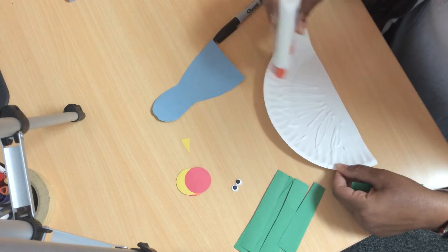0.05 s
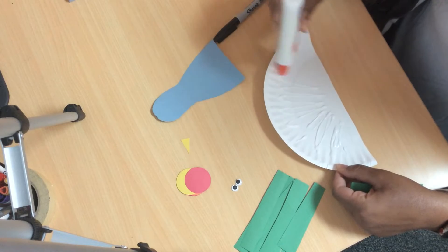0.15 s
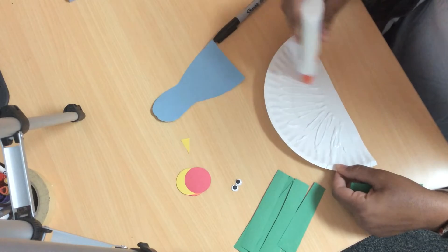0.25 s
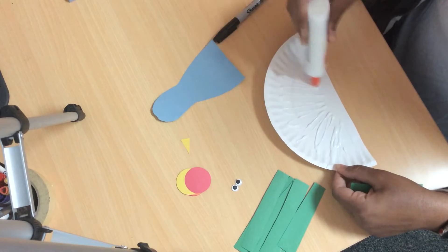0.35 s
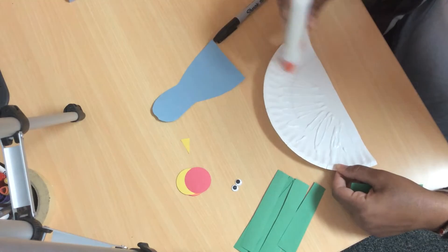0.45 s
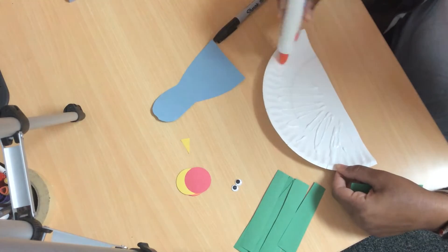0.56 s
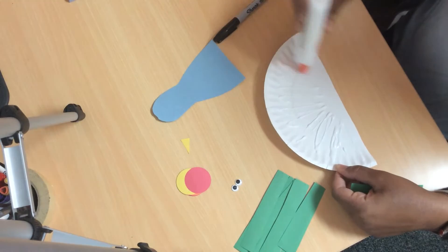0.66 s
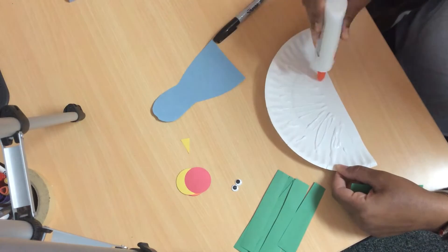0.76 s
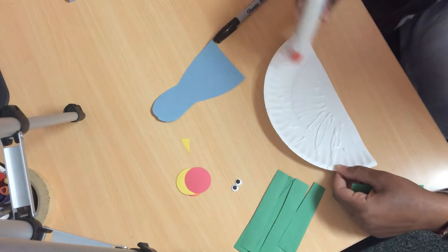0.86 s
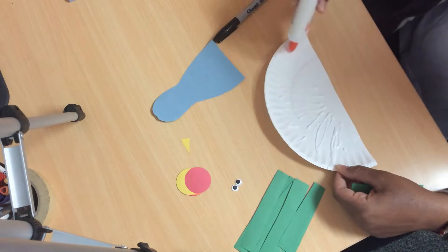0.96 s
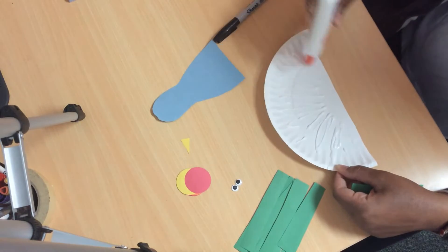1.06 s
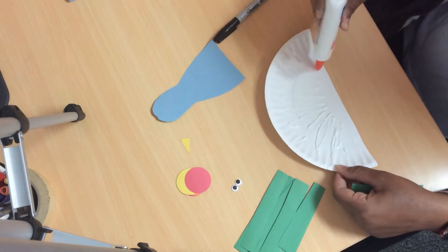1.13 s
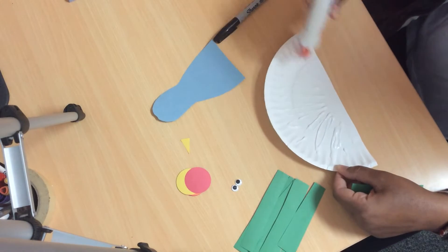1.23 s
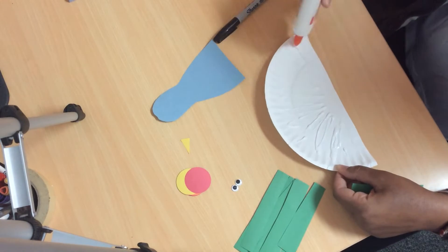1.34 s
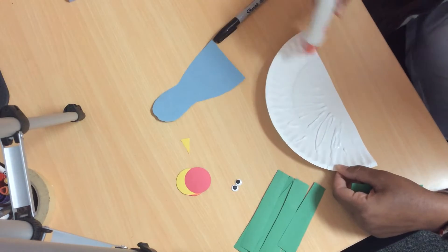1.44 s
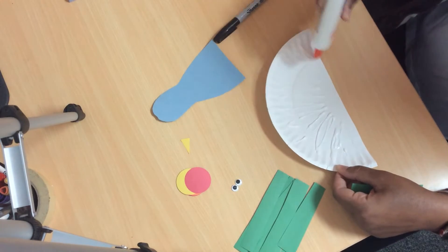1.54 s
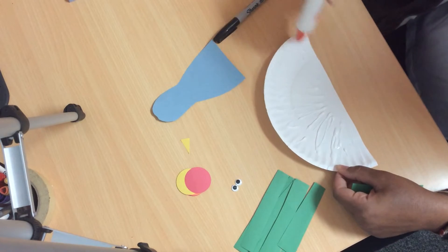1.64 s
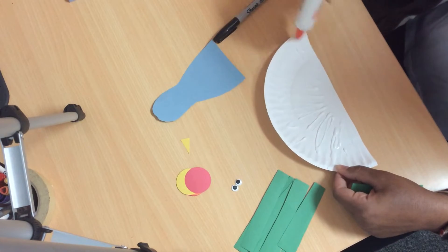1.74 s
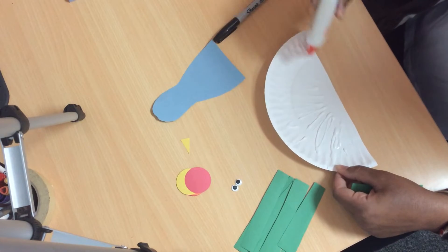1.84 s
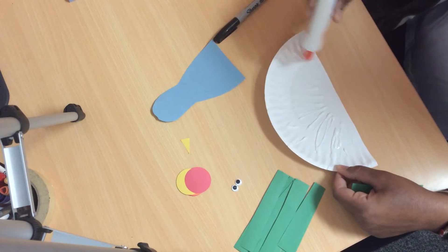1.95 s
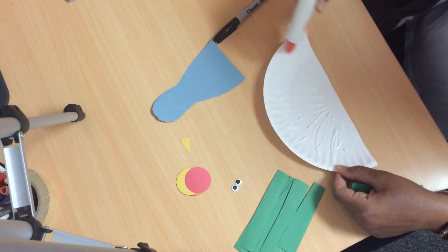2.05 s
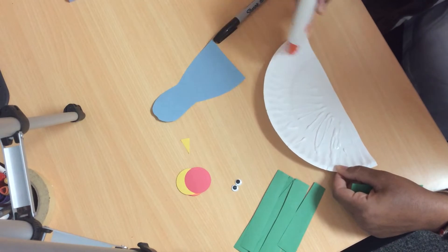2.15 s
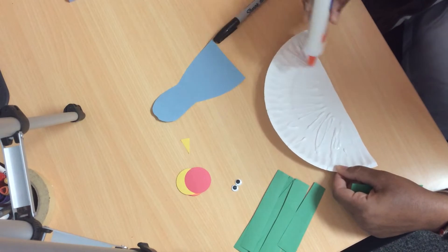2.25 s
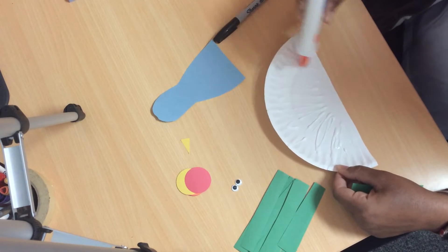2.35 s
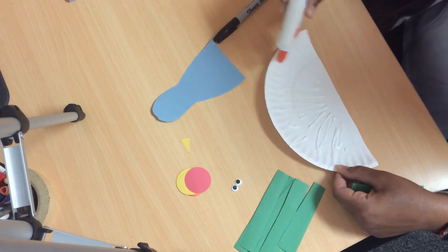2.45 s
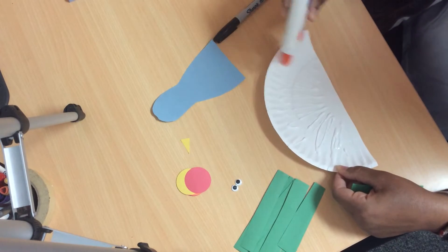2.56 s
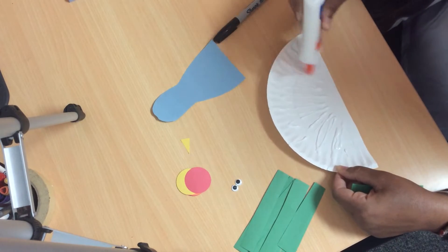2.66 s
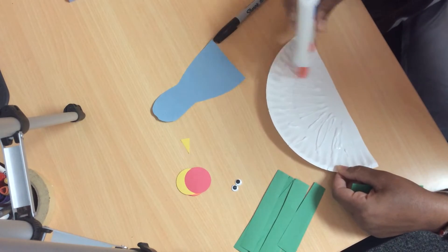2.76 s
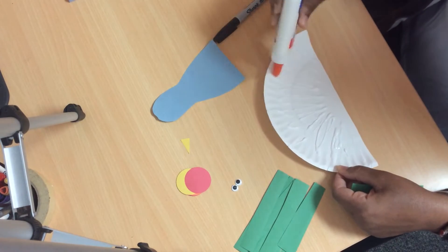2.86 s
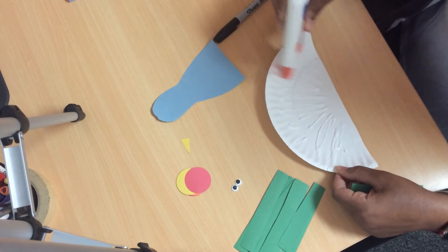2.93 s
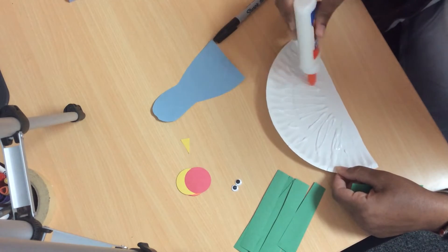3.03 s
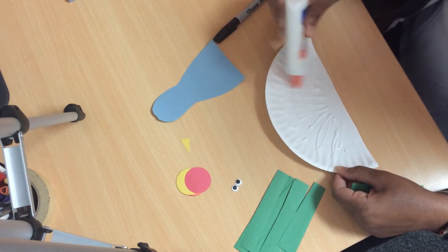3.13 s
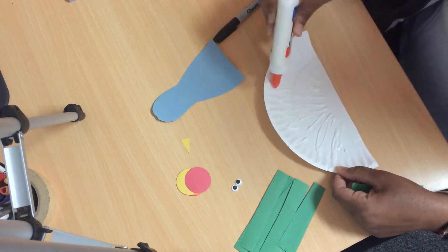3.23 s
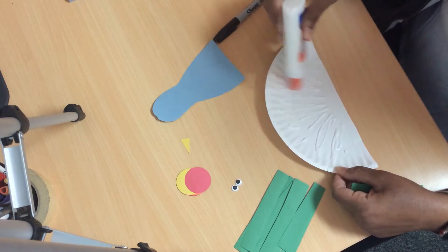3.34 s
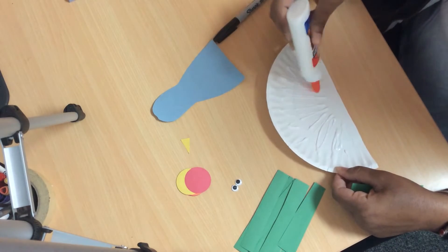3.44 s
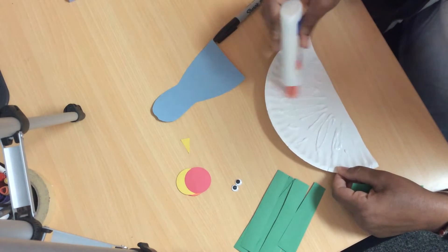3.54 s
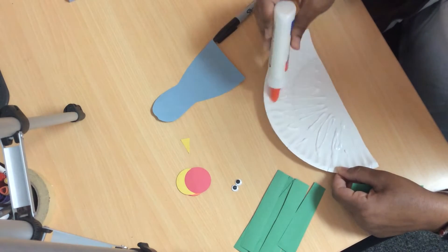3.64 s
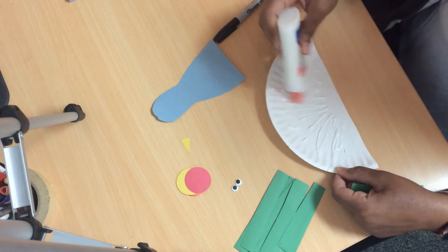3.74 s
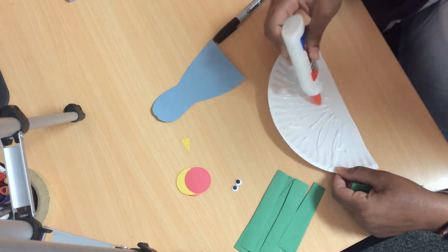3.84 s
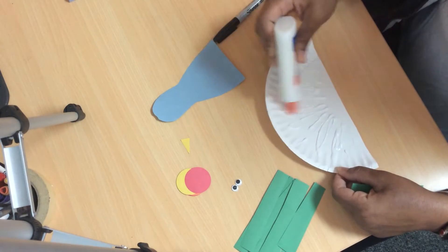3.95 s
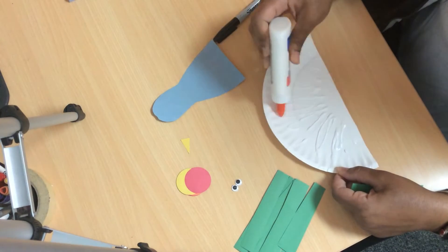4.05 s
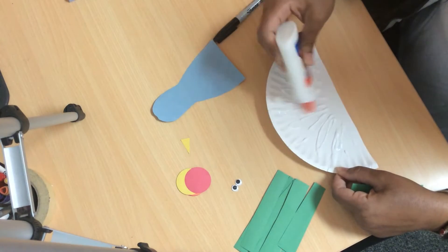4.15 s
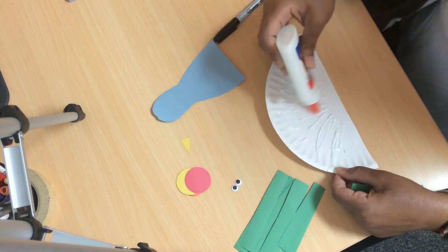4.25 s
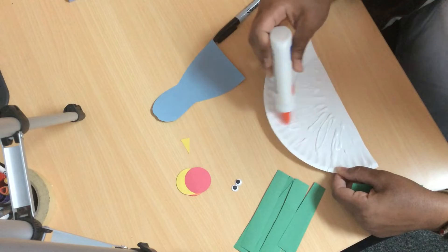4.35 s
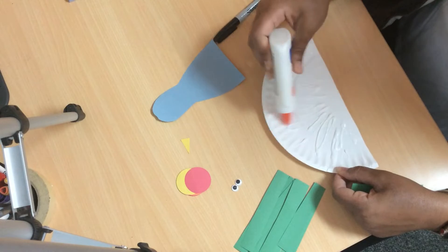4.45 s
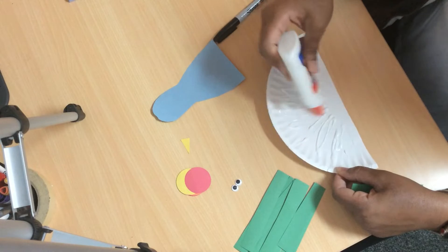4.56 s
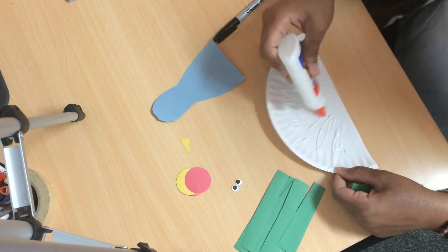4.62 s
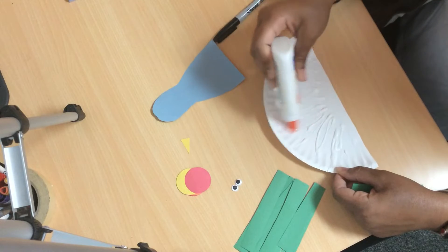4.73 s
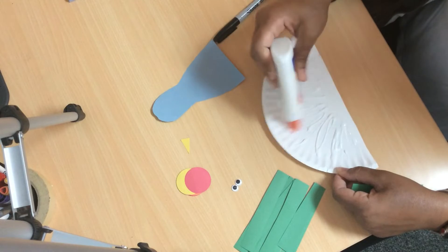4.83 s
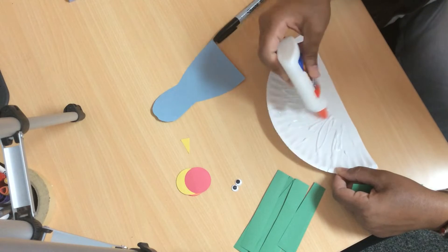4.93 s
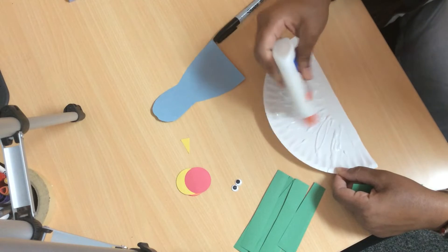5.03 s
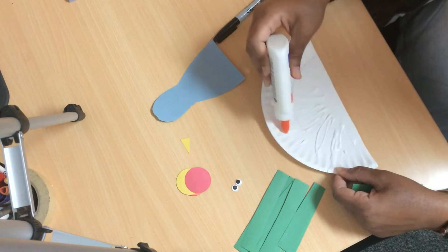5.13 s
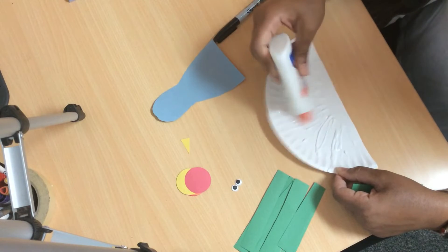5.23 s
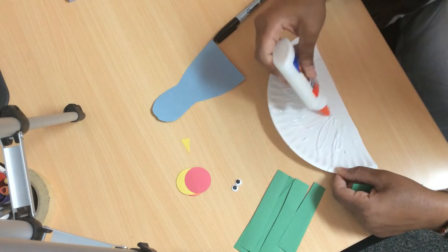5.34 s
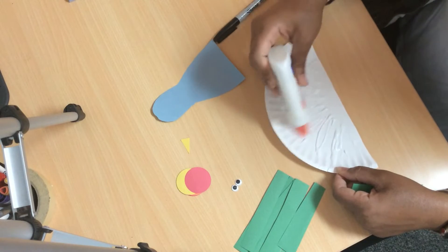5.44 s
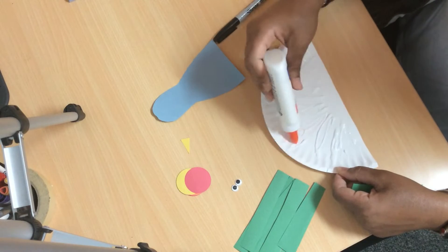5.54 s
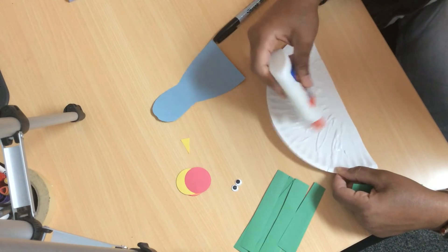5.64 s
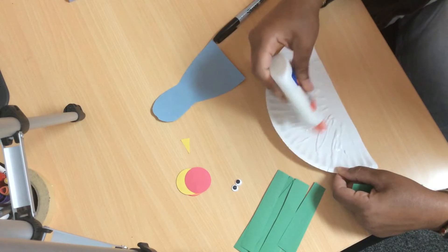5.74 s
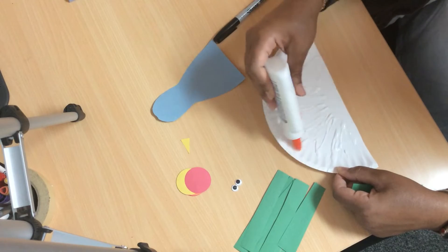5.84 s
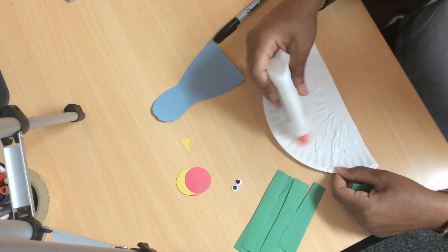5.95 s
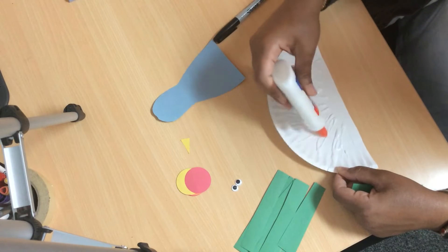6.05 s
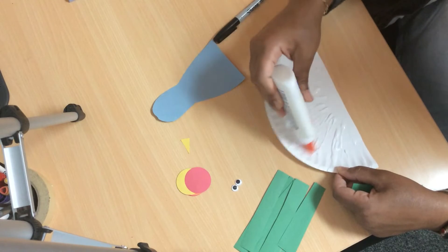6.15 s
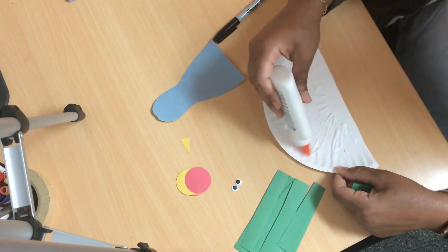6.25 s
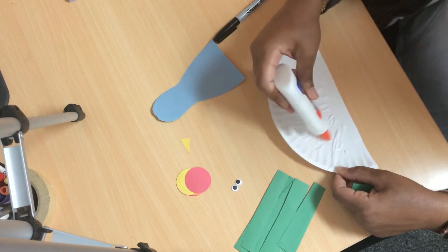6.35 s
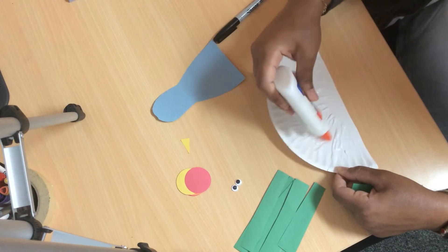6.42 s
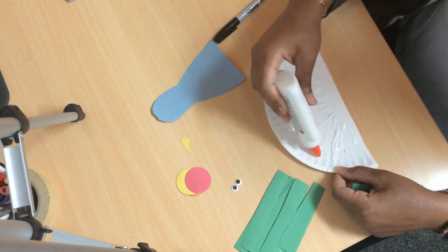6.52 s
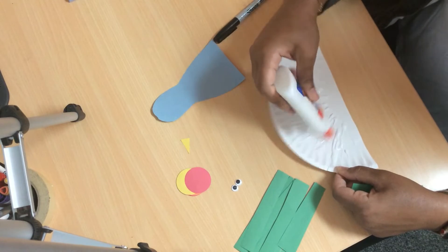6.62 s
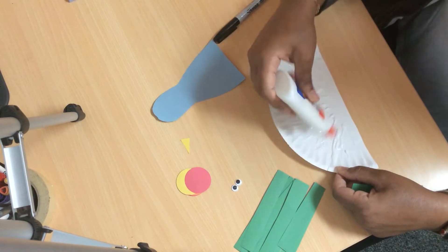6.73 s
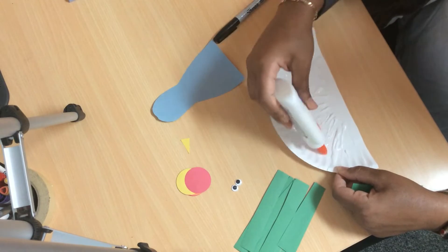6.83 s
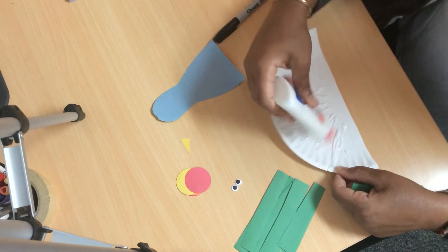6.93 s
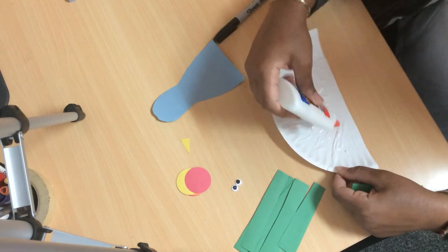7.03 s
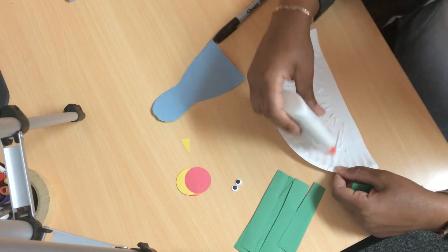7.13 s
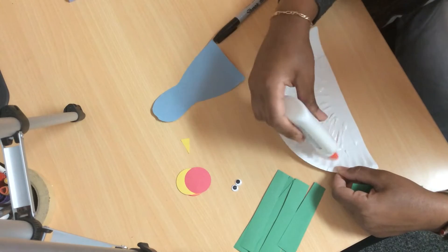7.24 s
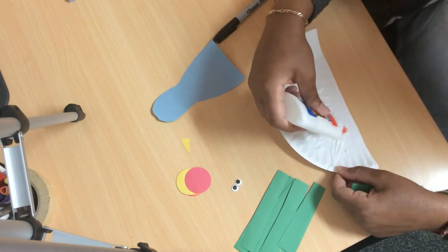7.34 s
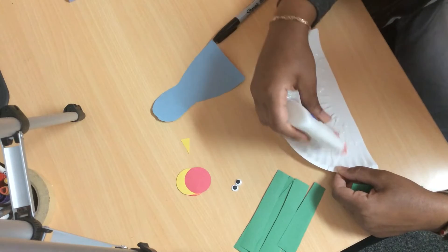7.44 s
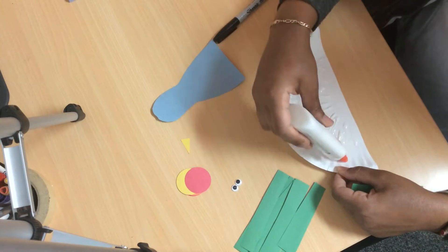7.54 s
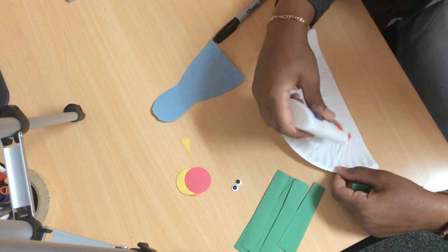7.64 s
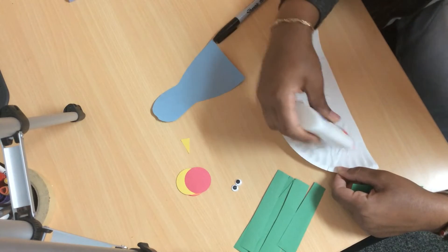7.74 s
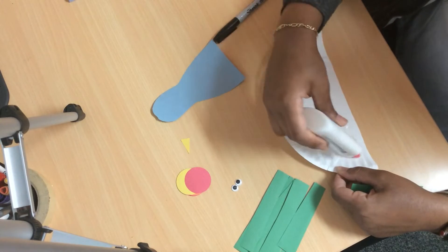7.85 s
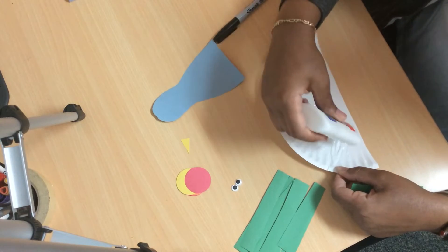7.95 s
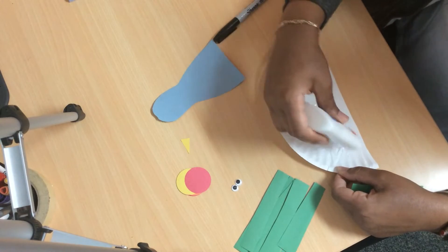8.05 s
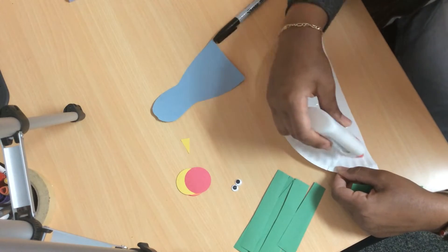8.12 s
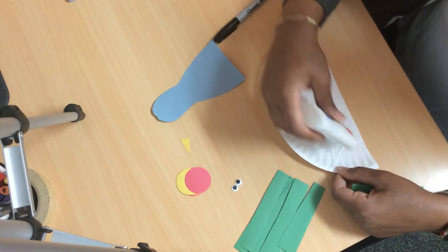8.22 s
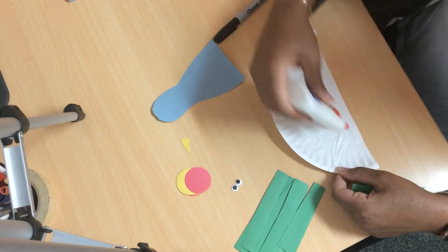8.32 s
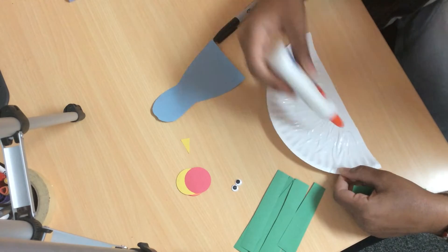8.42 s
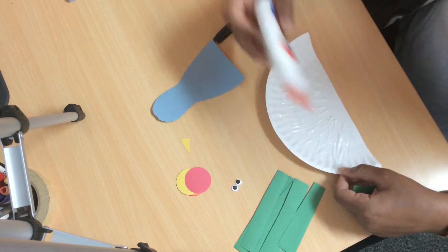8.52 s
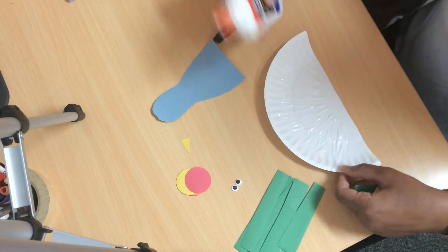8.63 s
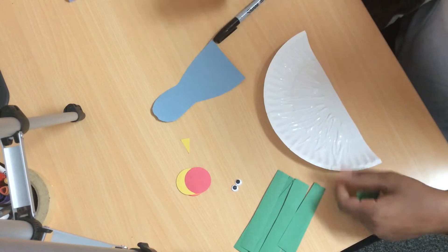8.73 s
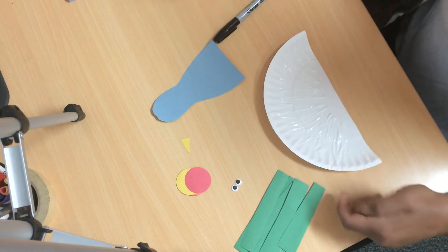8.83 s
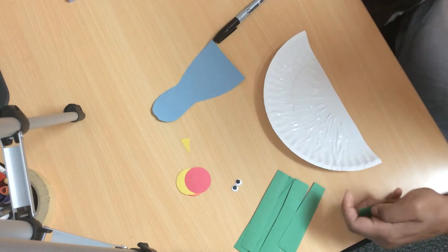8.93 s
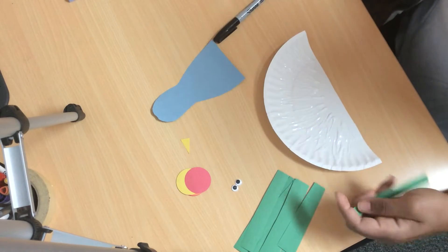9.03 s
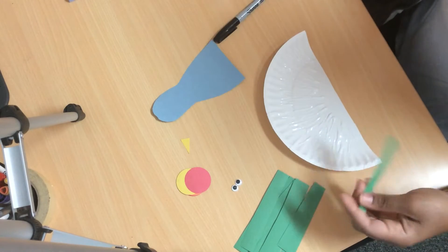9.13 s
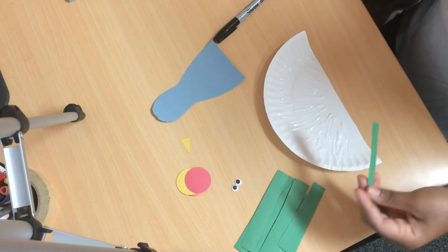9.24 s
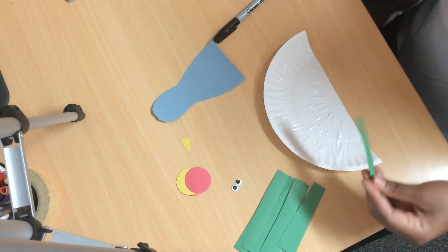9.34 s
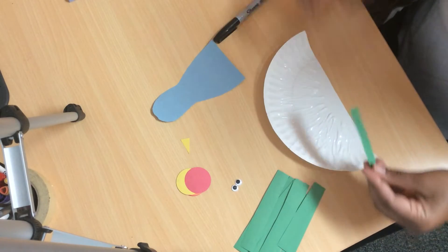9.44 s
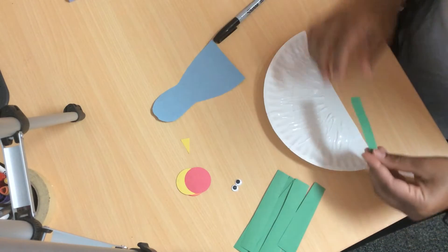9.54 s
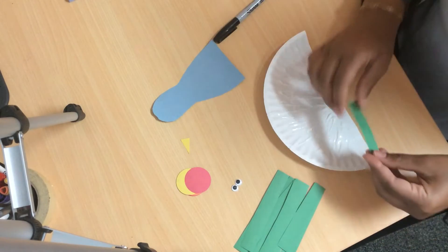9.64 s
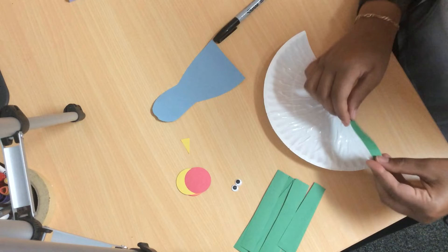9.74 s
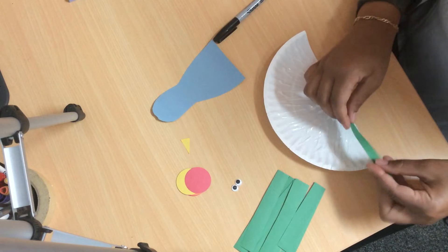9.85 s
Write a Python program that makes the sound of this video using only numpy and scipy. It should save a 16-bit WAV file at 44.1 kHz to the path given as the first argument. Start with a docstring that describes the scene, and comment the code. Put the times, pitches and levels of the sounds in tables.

```python
"""Glue stick on a paper plate

A glue stick is rubbed over a paper plate on a wooden table, in a small room with humming ventilation.
Stick-slip jerks of the tacky tip make rasp and hiss; pleats snap with a crackle and a short resonance.
Bumps of the plate, and the final knock of the stick on the table, excite the decaying modes of the wood.
Sliding paper swishes as a strip is picked up; filtered noise and wavering tones form the ventilation.
"""
import sys
import numpy as np
from scipy import signal
from scipy.fft import rfft, irfft
from scipy.io import wavfile

SR = 44100
rng = np.random.default_rng(int(sys.argv[2]) if len(sys.argv) > 2 else 0)


def output_pcm(signal):
    """Save a mono or channel-first signal as 16-bit PCM at the path in sys.argv[1].

    Samples are clipped to [-1, 1] before scaling.
    """
    pcm = np.clip(np.atleast_2d(signal).T, -1, 1) * 32767
    wavfile.write(sys.argv[1], SR, np.round(pcm).astype(np.int16))


N = 435708

# Quick rubs to and fro over the middle of the plate: (middle [s], relative level [dB])
RUB_TIMES = [(2.34, -64.5), (2.52, -67.5), (2.78, -73), (2.92, -66), (3.101, -67), (3.3, -69), (3.47, -65),
             (3.669, -70.5), (3.865, -61.5), (3.92, -72.5), (4.079, -64.5), (4.26, -64.5), (4.47, -69),
             (4.6, -66.5), (4.83, -68), (4.97, -67.5), (5.14, -68), (5.22, -68.5), (5.408, -63.5),
             (5.579, -65), (5.75, -65), (5.84, -65.5), (5.95, -67.5), (6.06, -66), (6.26, -64.5),
             (6.39, -68), (6.59, -69.5), (6.73, -66.5), (6.86, -71.5), (6.93, -69.5), (7.07, -69),
             (7.21, -71), (7.57, -71), (7.74, -68), (7.89, -66), (8.04, -71.5), (8.15, -78)]
RUB_S = 0.081  # from the peak of a rub to 1/e^2 of its amplitude
# Single strokes, mostly along the rim:
# (middle [s], length [s], relative level [dB], pitch of the scrape [Hz])
RIM_STROKES = [(0.103, 0.072, -58.5, 2950), (0.163, 0.048, -56.5, 4720), (0.28, 0.039, -66, 3200),
               (0.355, 0.055, -65.5, 4470), (0.538, 0.046, -56.5, 3840), (0.607, 0.06, -57, 4040),
               (0.697, 0.018, -60.5, 3760), (0.776, 0.084, -60, 4300), (1.027, 0.073, -58.5, 3950),
               (1.188, 0.074, -59, 5470), (1.312, .018, -59.5, 3180), (1.42, 0.047, -59.5, 5300),
               (1.544, 0.026, -58, 4950), (1.626, 0.02, -59.5, 3740), (1.811, 0.13, -70.5, 3340),
               (1.999, 0.021, -61.5, 3560), (2.659, 0.025, -65.5, 4260), (3.74, 0.016, -70.5, 3620),
               (8.33, .03, -71, 8000)]
# Coarse rasp over fine hiss; it peaks near 3 s, then falls: (time [s], relative level [dB])
RASP_COURSE = [(0.1, 2), (0.55, 0), (0.9, -2.5), (3.1, 6), (6.0, -2), (8.1, -6.5)]
# Paper snaps, mostly as the tip crosses a pleat: (time [s], relative crack level [dB],
# crackle length [s], pitch of the pleat [Hz], its ring against the crack [dB])
PLEAT_SNAPS = [(0.1452, -47.5, 0.014, 3580, 6), (0.183, -50, .012, 3700, 7),
               (0.259, -61.5, 0.017, 3000, 9.5), (0.3322, -47, 0.0058, 3520, 14),
               (0.5656, -45, .005, 3000, 8), (0.592, -44.5, 0.013, 9600, 9), (0.941, -49, 0.023, 4140, -1),
               (1.193, -48.5, 0.0071, 5100, -3), (1.3843, -52, 0.055, 5900, 3),
               (1.749, -52, 0.025, 2330, -3), (2.757, -58.5, 0.038, 3900, -2),
               (2.916, -53, 0.019, 4270, -9), (3.421, -51, 0.037, 5200, -3), (4.6274, -45, 0.016, 4400, -6),
               (5.0131, -49, 0.03, 4200, 1), (5.3793, -36, 0.0047, 4000, 1),
               (5.3843, -40, 0.0086, 4360, -2), (5.405, -48, 0.0071, 3800, -15),
               (5.7703, -45, 0.018, 4370, -0.5), (6.133, -47.5, 0.0068, 4360, 1),
               (6.4672, -53.5, 0.0095, 3700, 6), (6.757, -53, 0.015, 3600, -4),
               (7.458, -60.5, 0.012, 3400, 1)]
# The plate is bumped onto the table:
# (time [s], relative pat of the card [dB], relative thump of the wood [dB])
PLATE_BUMPS = [(0.801, -50, -61), (1.193, -46, -45), (2.003, -47, -37), (2.635, -51, -55),
               (3.867, -50, -53), (4.245, -52, -50), (8.453, -52, -37.5), (9.194, -48.5, -58)]
# The stick lands and rocks on its base; a soft, low thump follows later: # (time [s], relative level [dB], low-
# pass corner of the contact [Hz])
TABLE_CONTACTS = [(9.0254, -22, 5000), (9.0377, -21, 400), (9.048, -33, 400), (9.083, -36, 700),
                  (9.153, -38, 150)]
# Modes of the table top with the things on it: (frequency [Hz], relative level [dB], t60 [s])
TABLE_MODES = [(54, -12, 0.33), (100.2, -7, 0.23), (166, 3.5, 0.075), (212, -1.5, 0.055), (329, -9.5, 0.11),
               (446, -18.5, 0.16), (519, -14, 0.057), (690, -14, 0.066), (723, -12, 0.049),
               (1030, -22, 0.056), (1510, -33, 0.034), (1930, -23, 0.037), (2780, -27, 0.054)]
# Fingers and the paper strip slide: (middle [s], length [s], level [dB])
PAPER_SLIDES = [(8.68, 0.35, -78), (9.046, 0.041, -61.5), (9.141, 0.048, -57), (9.845, 0.042, -66)]

# Spectra of the sources, each: (frequency [Hz], relative density [dB per Hz])
FIBRE_SPECTRUM = [(1500, -6.5), (3000, -6.5), (4800, -5.5), (7300, -6.5), (8300, -2), (9200, -12),
                  (10200, -11), (11700, -8), (13000, -17), (14300, -11), (16000, -21)]
PLATE_SPECTRUM = [(300, 0.5), (700, -9), (1100, -5), (1900, 0.5), (2500, -15), (3600, 0), (5200, -4),
                  (8000, -6)]
SNAP_SPECTRUM = [(500, -6), (1500, 0), (2300, -4), (3300, 1.5), (4500, -1), (5600, -4.5), (7200, -5),
                 (8200, -4), (9300, -13), (12000, -12), (16000, -22)]
PAT_SPECTRUM = [(100, -3), (450, 5.5), (1000, 3), (1700, -7.5), (8000, -53)]
CLACK_SPECTRUM = [(200, 2.5), (900, 11.5), (1550, 1.5), (3200, -8.5), (4900, -4), (6200, -21.5),
                  (16000, -19)]
SLIDE_SPECTRUM = [(1500, -53), (3500, -11), (5200, -3), (8400, -1), (14800, -5), (16000, -19)]
DUCT_SPECTRUM = [(18, -34.5), (36, -18), (48, -21.5), (62, -4), (100, -2), (134, -3.5), (162, -12.5),
                 (200, -13), (250, -20), (550, -33), (900, -45), (2000, -84.5)]
AIR_SPECTRUM = [(300, -7), (700, -2.5), (1200, -2), (1700, 2.5), (2050, -3.5), (2500, -13), (3500, -15.5),
                (7200, -22.5), (8200, -17), (9500, -20), (15500, -31.5)]

# Fan and motor tones: (frequency [Hz], rms level [dB], rate of wavering [Hz])
MOTOR_TONES = [(118.7, -50.5, 6.2), (215.6, -60, 5.6), (327.2, -69.5, 4.1), (421, -74.5, 3.1),
               (490, -76.5, 3.8), (1530, -73.5, 10.3)]
RUMBLE_DB, AIR_DB = -46, -62.5
ROOM_T60_S = 0.34
CUTOFF_HZ = 15800


def rubbing(hiss_db, rasp_db, judder_db, catch_hz):
    """Stick-slip friction: sound follows sliding speed, and the catches wander in pitch with the tip."""
    wandering_hz = catch_hz * 2 ** (0.2 * drift(5))
    coarse = grains(wandering_hz, per_s=600, spread_db=14, scatter=0.7, fade_s=0.0008)
    speed = swells([(s, RUB_S, db) for s, db in RUB_TIMES])
    speed = speed * from_db(judder_db * np.tanh(drift(17)))
    hiss = from_db(hiss_db) * fibres()
    rasp = from_db(rasp_db + in_time(RASP_COURSE)) * coarse
    return speed * (hiss + rasp)


def rim_scrape(level_db, rasp_db, hiss_db):
    """Forced vibration: coarse jerks drive the card under the tip, at another pitch in each stroke."""
    pitch = in_time([(s, hz) for s, _, _, hz in RIM_STROKES])
    coarse = grains(pitch, per_s=480, spread_db=14, scatter=0.36, fade_s=0.0013)
    card = plate(slips(per_s=500, spread_db=0.0), patchy_db=1.0, t60=0.0024)
    tacky = from_db(level_db) * coarse + from_db(rasp_db) * card
    hiss = from_db(hiss_db) * fibres()
    speed = swells([row[:3] for row in RIM_STROKES])
    return speed * (from_db(in_time(RASP_COURSE)) * tacky + hiss)


def grains(centre_hz, per_s, spread_db, scatter, fade_s):
    """Random stick-slip: each jerk is a decaying sine within `scatter` octaves of the centre; rms 1."""
    t = np.arange(SR // 50) / SR
    out = np.zeros(N + SR)
    starts = np.flatnonzero(rng.random(N) < per_s / SR)
    for i, (size, bend) in zip(starts, rng.random((len(starts), 2))):
        hz = centre_hz[i] * 2 ** (scatter * (2 * bend - 1))
        level = from_db(spread_db * size ** 2)
        out[i:i + len(t)] += level * np.sin(2 * np.pi * hz * t) * np.exp(-t / fade_s)
    return rms_one(out[:N])


def plate(jerks, patchy_db, t60, count=22):
    """Modal exchange: short-lived card modes trade strength while their total gain stays even; rms 1."""
    gains = from_db([patchy_db * drift(10.4) for _ in range(count)])
    gains = gains / np.linalg.norm(gains, axis=0)
    modes = np.zeros(N)
    for gain, hz in zip(gains, np.linspace(600, 6600, count)):
        modes += rng.choice([-1, 1]) * ring(jerks * gain, hz, t60)
    return rms_one(colour(modes, PLATE_SPECTRUM))


def fibres():
    """Fine friction: dense slips on the paper's fibres merge into a hiss."""
    return colour(slips(per_s=4100, spread_db=0.5), FIBRE_SPECTRUM)


def slips(per_s, spread_db):
    """Random impulses: tiny jerks of either sign, their sizes scattered by `spread_db`; rms 1."""
    sizes = from_db(spread_db * np.minimum(rng.exponential(1, N), 4))
    happens = rng.random(N) < per_s / SR
    return rms_one(happens * sizes * rng.choice([-1, 1], N))


def pleats(level_db, width_hz):
    """Sudden release: a pleat lets go in a short run of cracks and resonates at its own pitch."""
    cracks = slips(per_s=13000, spread_db=2.0)
    out = np.zeros(N)
    for s, db, length, hz, ring_db in PLEAT_SNAPS:
        snap = bursts([(s, db, length)], rise_s=0.0013) * cracks
        out += snap + from_db(ring_db) * resonance(snap, hz, width_hz)
    return colour(out, SNAP_SPECTRUM) * from_db(level_db)


def knock():
    """Impact excitation: each contact drives the table, a soft one with less treble."""
    force = np.zeros(N)
    for s, db, soft_hz in TABLE_CONTACTS:
        click = signal.unit_impulse(N, round(s * SR)) * from_db(db)
        softening = signal.butter(1, soft_hz, fs=SR, output="sos")
        force += signal.sosfilt(softening, click + 1e-18)
    return table_top(force)


def clack(level_db, length, rock_db):
    """Impact noise: the plastic tube clacks as it first lands, and more softly as it rocks back."""
    landing_s, rock_s = TABLE_CONTACTS[0][0], TABLE_CONTACTS[2][0]
    contacts = [(landing_s, level_db, length), (rock_s, level_db + rock_db, length)]
    noise = bursts(contacts, rise_s=0.00065) * rng.standard_normal(N)
    return colour(noise, CLACK_SPECTRUM)


def bumps(level_db, length, wood_db):
    """Light impact: the plate pats the table, dull and short, and the impulse sets the wood ringing."""
    force = np.zeros(N)
    for s, _, db in PLATE_BUMPS:
        force[round(s * SR)] = from_db(db + wood_db)
    pats = [(s, db + level_db, length) for s, db, _ in PLATE_BUMPS]
    pat = bursts(pats, rise_s=0.00038) * rng.standard_normal(N)
    return colour(pat, PAT_SPECTRUM) + table_top(force)


def table_top(force):
    """Modal superposition: the wood's response is a sum of decaying sines of alternating sign."""
    out = np.zeros(N)
    for k, (hz, db, t60) in enumerate(TABLE_MODES):
        out += (-1) ** k * from_db(db) * ring(force, hz, t60)
    return out


def strip():
    """Sliding friction: dense slips of dry paper make a smooth, bright swish."""
    return swells(PAPER_SLIDES) * colour(slips(per_s=9800, spread_db=-10.0), SLIDE_SPECTRUM)


def ventilation(waver):
    """Broadband flow noise and tones: duct rumble, rushing air and wavering motor hum."""
    t = np.arange(N) / SR
    out = from_db(RUMBLE_DB) * colour(rng.standard_normal(N), DUCT_SPECTRUM)
    out += from_db(AIR_DB) * colour(rng.standard_normal(N), AIR_SPECTRUM)
    for hz, db, rate in MOTOR_TONES:
        # the complex factor wavers both strength and phase
        sway = 1 + waver * (drift(rate) + 1j * drift(rate))
        out += from_db(db) * rms_one(np.real(sway * np.exp(2j * np.pi * hz * t)))
    return out


def room(x, wet_db, dull_hz):
    """Reverberation: dense reflections start 4 ms after the direct sound and decay exponentially."""
    t = np.arange(SR // 2) / SR
    tail = rng.standard_normal(len(t)) * from_db(-60 * t / ROOM_T60_S) * (t > .004)
    band_hz = [330, np.clip(dull_hz, 1000, SR * .4)]
    walls = signal.butter(1, band_hz, "band", fs=SR, output="sos")
    reflections = signal.sosfilt(walls, tail / np.linalg.norm(tail))
    return x + from_db(wet_db) * signal.oaconvolve(x, reflections)[:N]


def swells(rows):
    """Bell-shaped speed for each (middle [s], length [s], level [dB]); overlapping powers add."""
    power, t = np.zeros(N), np.arange(N) / SR
    for s, length, db in rows:
        near = slice(max(0, int((s - 2 * length) * SR)), int((s + 2 * length) * SR))
        bell = from_db(db) * np.exp(-2 * ((t[near] - s) / length) ** 2)
        power[near] += bell ** 2
    return np.sqrt(power)


def bursts(rows, rise_s):
    """Exponential decay: each (time [s], level [dB], length [s]) rises fast, falls 20 dB per length."""
    out, t = np.zeros(N), np.arange(SR // 2) / SR
    for s, db, length in rows:
        part = out[round(s * SR):][:len(t)]  # a view into out
        envelope = from_db(db - 20 * t / length) * (1 - np.exp(-t / rise_s))
        part += envelope[:len(part)]
    return out


def ring(clicks, hz, t60):
    """Damped oscillator: a unit click starts a sine of height 1 that falls 60 dB in t60 seconds."""
    r, w = from_db(-60 / (t60 * SR)), 2 * np.pi * hz / SR
    return signal.lfilter([0, np.sin(w)], [1, -2 * r * np.cos(w), r * r], clicks + 1e-18)


def resonance(x, hz, width_hz):
    """Driven resonance: a two-pole band-pass with a gain near 1 at its peak."""
    r = np.exp(-np.pi * width_hz / SR)
    zeros = np.array([1, 0, -1]) * (1 - r * r) / 2
    poles = [1, -2 * r * np.cos(2 * np.pi * hz / SR), r * r]
    return signal.lfilter(zeros, poles, x + 1e-18)


def colour(x, points, size=8192):
    """Spectral shaping: a causal, minimum-phase filter of the given spectrum and unit energy."""
    hz, db = np.transpose(points)
    bins = np.maximum(np.fft.rfftfreq(size, 1 / SR), 1)
    magnitude = from_db(np.interp(np.log(bins), np.log(hz), db))
    # folding the cepstrum onto positive time gives minimum phase
    cepstrum = irfft(np.log(magnitude))
    cepstrum[1:size // 2] *= 2
    cepstrum[size // 2 + 1:] = 0
    response = irfft(np.exp(rfft(cepstrum)))
    return signal.oaconvolve(x, response / np.linalg.norm(response))[:N]


def drift(rate):
    """Low-pass noise: slow random motion of rms 1, drawn every 40th sample and smoothed twice."""
    r = np.exp(-80 * np.pi * rate / SR)  # pole for a corner of rate [Hz]
    noise = rng.standard_normal(N // 40 + 2002)
    slow = signal.lfilter([1], [1, -2 * r, r * r], noise)[2000:]  # drop the filter's start-up
    return np.interp(np.arange(N) / 40, np.arange(len(slow)), rms_one(slow))


def in_time(rows):
    """Linear interpolation: a curve joined by straight lines, one value a sample."""
    return np.interp(np.arange(N) / SR, *np.transpose(rows))


def from_db(db):
    """Logarithmic level to amplitude ratio."""
    return 10 ** (np.asarray(db) / 20)


def rms_one(x):
    """Normalization to a root-mean-square value of 1."""
    return x / np.sqrt(np.mean(x ** 2) + 1e-20)


def scene():
    """Superposition: paper, wood and tube, each with its reflections, add to the ventilation."""
    rub = rubbing(hiss_db=0.5, rasp_db=-3.0, judder_db=4.5, catch_hz=4270)
    rub = rub + rim_scrape(level_db=0.0, rasp_db=-2.0, hiss_db=-1.0)
    snaps = pleats(level_db=2.5, width_hz=1750)
    paper = room(rub + strip(), wet_db=-6.0, dull_hz=8750) + room(snaps, wet_db=-5.0, dull_hz=8000)
    impacts = knock() + bumps(level_db=-2.5, length=0.039, wood_db=-3.5)
    wood = room(impacts, wet_db=-4.5, dull_hz=3980)
    tube = room(clack(level_db=-33.0, length=0.021, rock_db=-18), wet_db=-7.5, dull_hz=4000)
    return (paper + wood + tube + ventilation(waver=0.71))[None]


def record(dry):
    """Band limiting: a steep elliptic low-pass removes the top of the treble."""
    low_pass = signal.ellip(12, .1, 80, CUTOFF_HZ, fs=SR, output="sos")
    return signal.sosfilt(low_pass, dry)


dry = scene()
out = record(dry)
output_pcm(out)
```